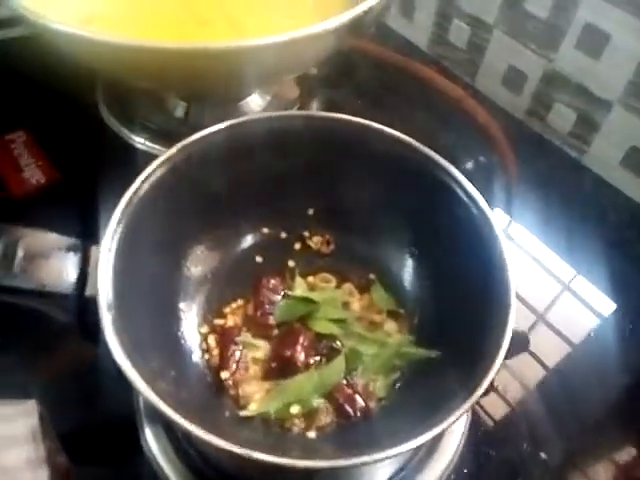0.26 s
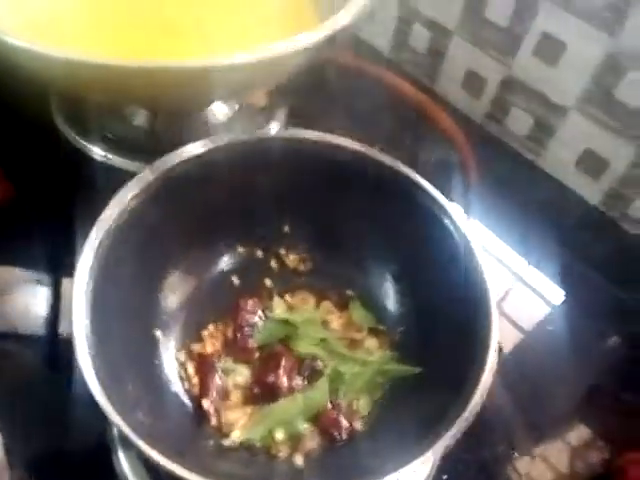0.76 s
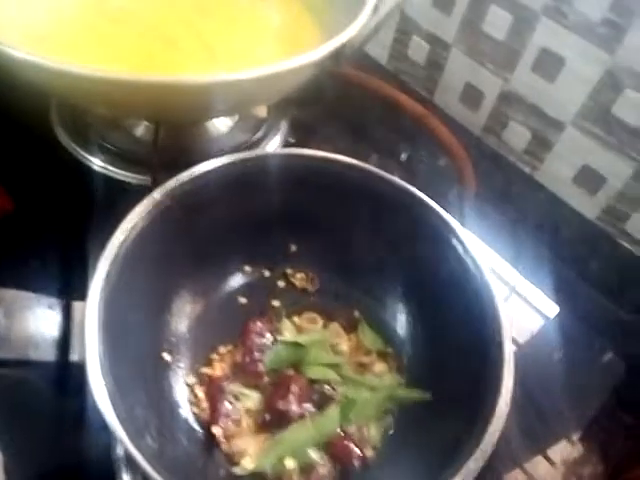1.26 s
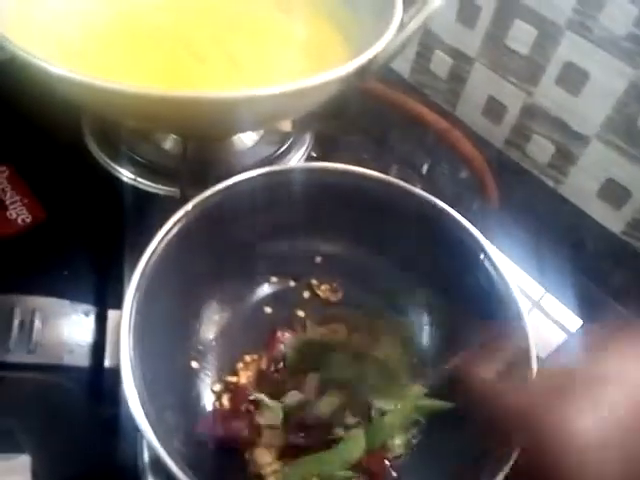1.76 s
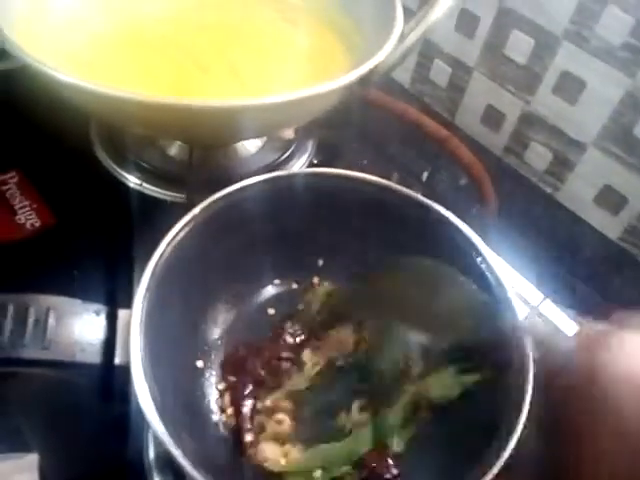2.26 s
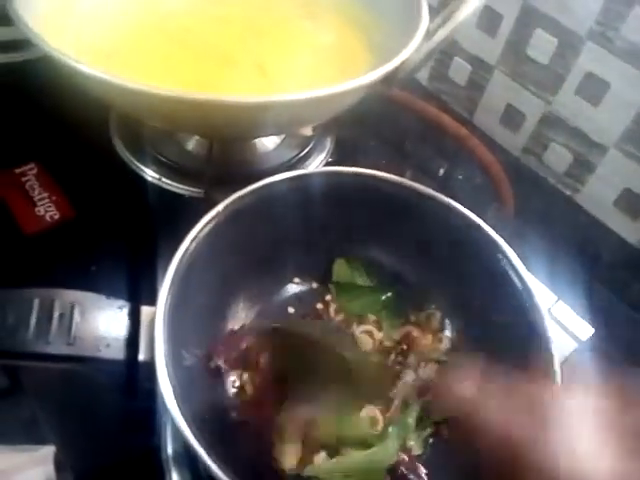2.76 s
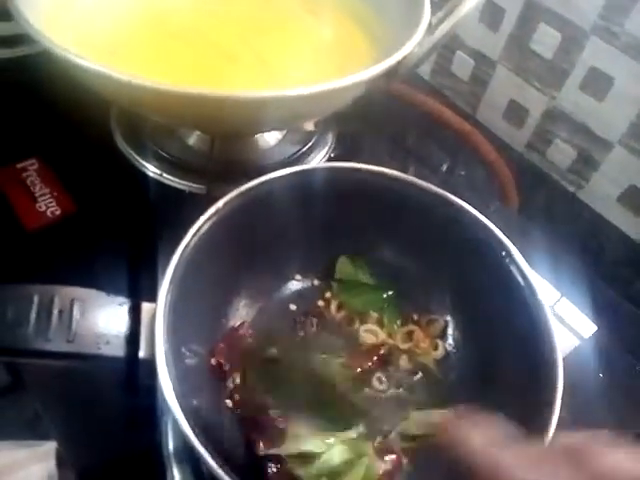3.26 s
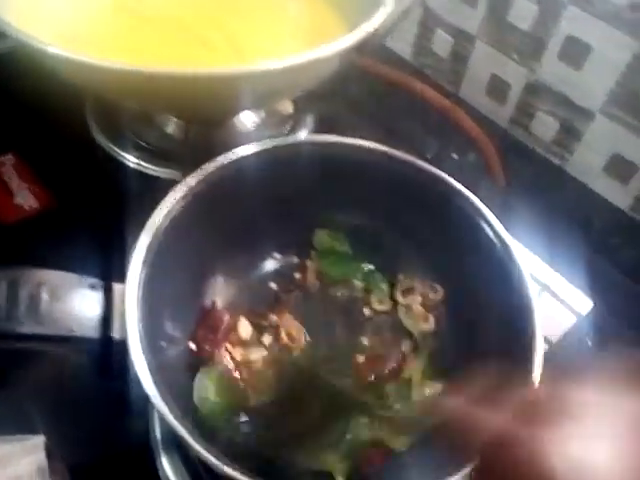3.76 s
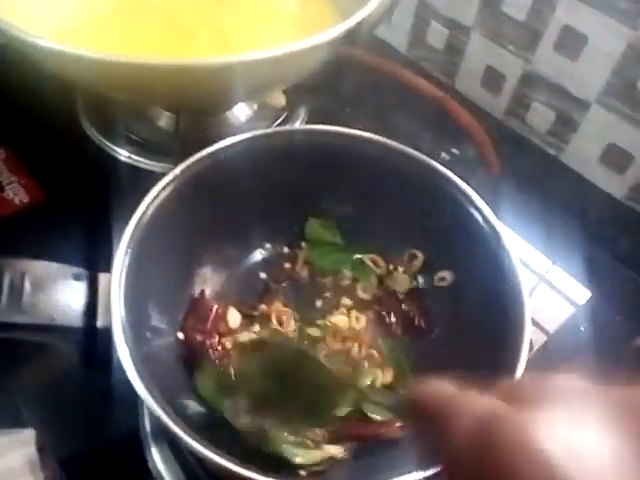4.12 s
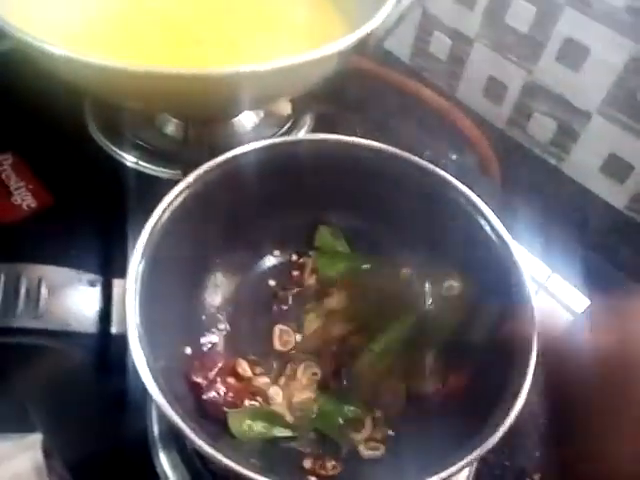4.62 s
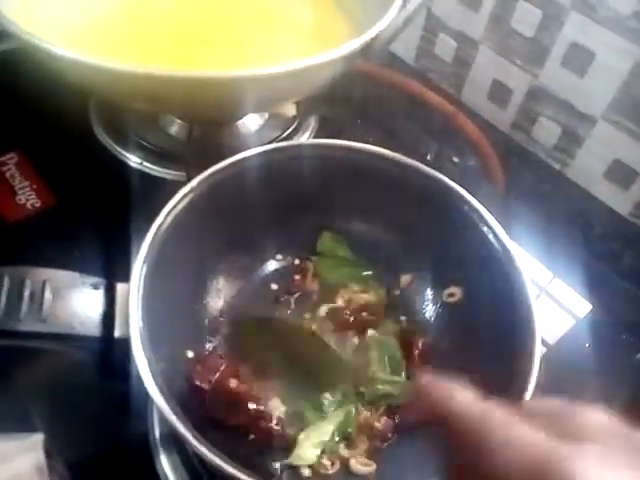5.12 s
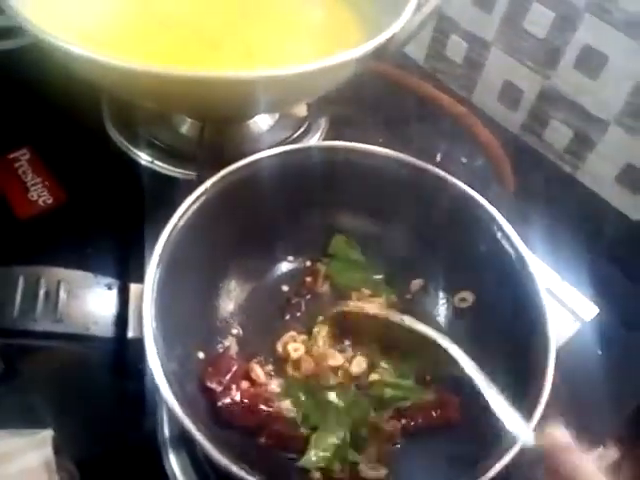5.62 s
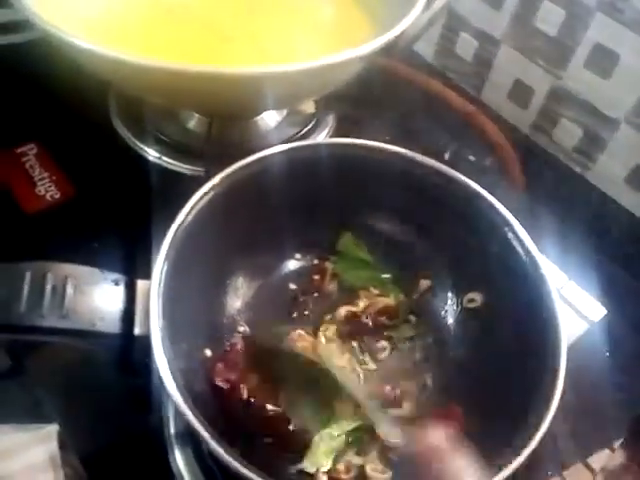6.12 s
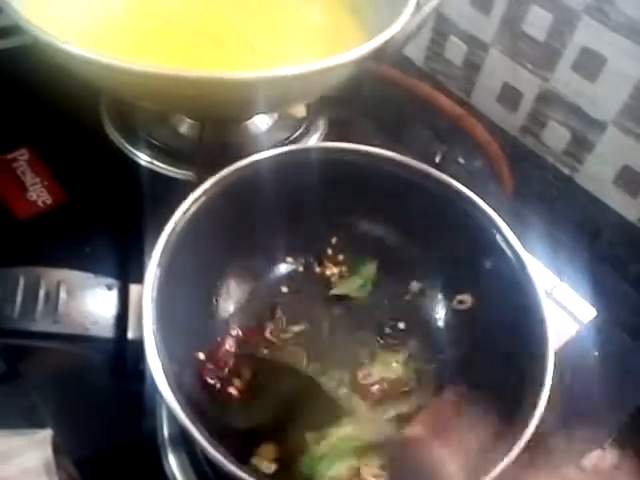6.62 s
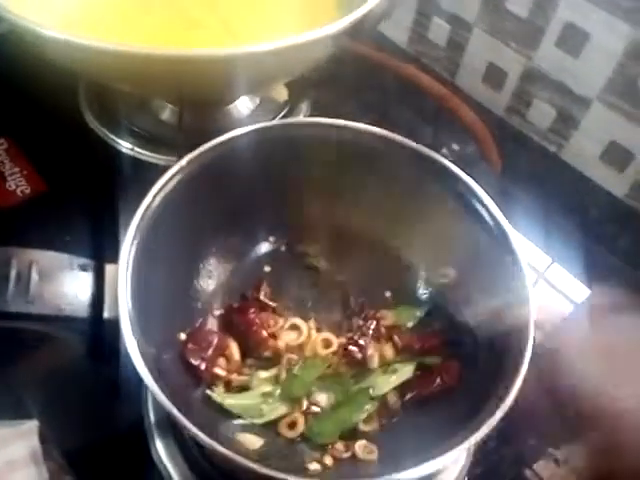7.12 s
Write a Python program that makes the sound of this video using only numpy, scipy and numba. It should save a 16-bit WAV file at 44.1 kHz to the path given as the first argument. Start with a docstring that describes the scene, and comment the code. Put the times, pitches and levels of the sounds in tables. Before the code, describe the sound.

A close phone pickup of spices frying in a small pan, in a tiled kitchen with short faint echoes. A steady, soft gas and room hiss lies underneath throughout. At the start a blurred metallic clink fades away; at 0.2 s a pod bursts with a hard crack, the loudest moment, and a broad roar that shakes the pan and cuts off by about 0.5 s. Thin sizzle and small ticks follow, with light scrapes at 0.7 and 1.2 s. From 1.5 s a spoon stirs, tapping the pan. Bright pops and crackle thicken from 2.3 s, with crunchy strokes and knocks near 2.6, 3.3 and 4.1 s, and the densest snapping around 4.8 to 5.3 s. More taps and pops come until 6 s. Then the sizzle sinks, with a faint scrape at 6.4 s, one sharp snap at 6.9 s and tiny ticks to the end near 7.4 s.

```python
"""A small pan of seeds, onion rings, chillies and brittle leaves in a little oil, close under a phone.
A blurred clink fades from earlier clatter; almost at once a pod bursts, a noise roar that shakes the pan.
Then damped-sine steam pockets sizzle, and spoon strokes swell them into flurries among sharp pops and knocks.
The knocks drive the pan's resonances; pops and knocks echo off kitchen tiles through a delay network.
Late on the sizzle sinks. Shaped noise hisses underneath throughout: the gas flame and the house."""
import sys
import numpy as np
from scipy import signal
from scipy.fft import rfft, irfft
from scipy.io import wavfile
from scipy.ndimage import uniform_filter1d
from numba import njit

SR = 44100
rng = np.random.default_rng(int(sys.argv[2]) if len(sys.argv) > 2 else 0)


def wrap_up_sound(samples):
    """Save the sound to the file named by the first command line argument, as 16-bit audio."""
    columns = np.atleast_2d(samples).T
    # keep every value between -1 and 1, then stretch to whole-number steps
    tamed = np.clip(columns, -1, 1)
    steps = np.round(tamed * 32767).astype(np.int16)
    wavfile.write(sys.argv[1], SR, steps)


N = 325458  # samples

# All dB in the tables stand ahead of the phone; in spectra and pan modes only the balance counts.
# burner and house hiss, spectrum: pitch_hz [Hz], density_db [dB per Hz]
FLAME_SPECTRUM = [(18, -57), (30, -8), (253, 1), (333, -17.5), (609, -0.5), (1690, 2.5), (3230, -5),
                  (5890, 3), (7090, -28.5), (7600, 7.5), (9880, -44), (16700, -120)]
# clink from earlier clatter: pitch_hz [Hz], width_hz [Hz], rms level_db before the fade [dB], t60_s [s]
OPENING_RING = [(1030, 36, -52.5, 0.56), (1460, 170, -48, 0.39), (2470, 40, -59, 0.47),
                (4860, 100, -55, 0.44)]
# resonances of the pan: pitch_hz [Hz], width_hz [Hz], level_db [dB]
PAN_MODES = [(329.5, 51, -3), (631, 194, -7.5), (974, 80, -15), (1670, 160, -10), (2020, 220, -11.5),
             (2840, 254, -11.5), (3446, 205, -10.5), (4133, 264, -7)]
# roar of the bursting pod, spectrum: pitch_hz [Hz], density_db [dB per Hz]
BURST_SPECTRUM = [(88, -57), (150, -38), (341, -12), (738, -12), (1980, -11), (2410, -5), (4070, -9.5),
                  (5560, -1.5), (7600, -14), (9880, -69), (16700, -120)]
# spoon and flying seeds knock the pan, drive before the mixing gains in knocks():
# start_s [s], level_db [dB], whole_pan_db against level_db [dB], pitch_hz [Hz]
KNOCKS = [(0.182, -8.5, -8.5, 3050), (1.1927, -37, -15, 923), (1.5508, -23.5, -28, 3740),
          (1.5775, -20.5, -18.5, 2970), (1.8481, -28, -20, 1670), (2.4826, -28, -21, 1820),
          (2.596, -21, -25, 3460), (2.6323, -25, -19, 1740), (2.7447, -23.5, -29, 3020),
          (2.8908, -37, -31, 2030), (3.109, -27, -28, 2820), (3.2792, -13.5, -38, 1570),
          (3.2994, -23.5, -17, 2900), (3.44, -17.5, -11.5, 1750), (3.686, -20, -21, 1620),
          (3.714, -16, -18.5, 3630), (3.8148, -25.5, -19, 1940), (3.977, -22.5, -28, 3130),
          (4.0751, -21, -17, 1690), (4.1061, -18.5, -19, 2830), (4.2788, -21.5, -27, 2620),
          (4.4205, -25, -12.5, 1990), (4.6663, -22.5, -20.5, 2890), (4.7877, -16.5, -39, 1660),
          (4.8821, -23.5, -19, 2030), (4.9789, -20, -30, 1810), (5.024, -8, -26, 2600),
          (5.1247, -20, -28, 3600), (5.2264, -46, -18, 3580), (5.4612, -26.5, -32, 3600),
          (5.7947, -33.5, 8.5, 950), (5.8274, -14, -14, 3400), (5.9519, -19, -23.5, 3100),
          (5.9775, -20, -19.5, 3260), (6.8803, -26, -32, 3570)]
# loudest single pops, drive before the trim and filter in pops(): start_s [s], level_db [dB], pitch_hz [Hz]
POPS = [(0.0538, -31, 5030), (0.182, 4, 4780), (0.1851, 0.5, 5350), (0.2082, -1.5, 5240), (0.389, -9, 5720),
        (0.5302, -26, 6190), (0.5858, -29.5, 3377), (0.656, -40, 6030), (0.7682, -36, 6720),
        (0.9905, -25, 3700), (1.2203, -29.5, 6760), (1.293, -27, 6150), (1.3487, -30.5, 6040),
        (1.5519, -15.5, 6300), (1.5953, -17, 5930), (1.6585, -34, 5850), (1.853, -20.5, 5280),
        (1.8687, -12, 5520), (2.0572, -19, 5940), (2.1395, -18.5, 6100), (2.174, -21, 6100),
        (2.3087, -13.5, 6040), (2.4239, -23, 5970), (2.4818, -13, 6430), (2.5526, -10.5, 5930),
        (2.593, -6.5, 7080), (2.6075, -8.5, 5860), (2.6309, -9.5, 5730), (2.6414, -5.5, 6150),
        (2.7192, -9, 6150), (2.8355, -15, 5440), (2.8908, -9, 6370), (2.9956, -16, 5630),
        (3.1083, -10, 6050), (3.1884, -25, 6090), (3.2798, -8, 4930), (3.3164, -6.5, 6970),
        (3.4411, -12.5, 5680), (3.6471, -11, 5870), (3.707, -5, 6350), (3.8212, -26, 6210),
        (3.928, -2, 7090), (3.9709, -12, 5000), (4.0422, -11.5, 5790), (4.0751, -3, 5950),
        (4.1077, -4, 5780), (4.2048, -5, 6870), (4.2378, -10, 6030), (4.3061, -10, 5750),
        (4.4204, 0.5, 6080), (4.6703, -16.5, 6840), (4.7531, -20.5, 6040), (4.7998, -2.5, 5720),
        (4.8828, -7.5, 5980), (4.9033, -9.5, 6200), (4.9541, -12.5, 5660), (4.9791, 2.5, 5590),
        (5.024, -1.5, 5980), (5.036, 1, 6600), (5.1075, -11, 5750), (5.1248, -5.5, 6430),
        (5.1497, -10, 6740), (5.1956, -5, 6850), (5.2268, -10, 6320), (5.3381, -23.5, 6600),
        (5.3802, -18, 7100), (5.4605, -7.5, 4850), (5.4809, -8.5, 7050), (5.5139, -4.5, 6400),
        (5.6454, -19, 6970), (5.8152, -14.5, 4030), (5.8606, -9.5, 6300), (5.8989, -11, 6960),
        (5.9514, -12, 6450), (5.9763, -3.5, 6670), (6.221, -32, 5560), (6.6496, -27.5, 5900),
        (6.7471, -27.5, 6100), (6.8788, -10, 6290), (7.228, -28.5, 5820), (7.3002, -30.5, 6300),
        (7.3447, -27, 5100)]
# sizzle of steam pockets, spectrum: pitch_hz [Hz], density_db [dB per Hz]
FIZZ_SPECTRUM = [(1760, -37), (3000, -25.5), (4600, -13), (5900, -2.5), (7250, -5.5), (7610, -11.5),
                 (8080, -40), (8520, -40), (11100, -62), (18700, -120)]
# how hard the food sizzles, before and after the burst, more while the spoon stirs:
# start_s [s], treble level_db [dB]
SIZZLE = [
    [(0.0, -42), (0.17, -51.5)],
    [(0.46, -49.5), (0.86, -51.5), (1.58, -54.5), (1.75, -53.5), (1.96, -47.5), (2.29, -37.5),
     (2.73, -32.5), (3.12, -42), (3.77, -39), (4.16, -36), (4.51, -39), (4.79, -41.5), (5.01, -27),
     (5.07, -27.5), (5.24, -48), (5.57, -49), (5.93, -44.5), (6.51, -52), (6.78, -46.5), (7.38, -57)],
]
# spoon crushes leaves and seeds against the pan, then lifts: start_s [s], length_s [s], treble level_db [dB]
STROKES = [(0.726, 0.075, -48.5), (1.157, 0.16, -49.5), (1.542, 0.16, -39), (2.585, 0.078, -28),
           (2.72, 0.17, -35), (3.27, 0.029, -27), (3.425, 0.11, -38.5), (3.643, 0.1, -29),
           (3.788, 0.042, -32.5), (3.912, 0.11, -34.5), (4.057, 0.073, -22.5), (4.203, 0.099, -26),
           (4.406, 0.02, -30), (4.774, 0.044, -26.5), (4.868, 0.272, -28), (5.188, 0.045, -30.5),
           (5.45, 0.031, -28.5), (5.51, 0.025, -33), (5.799, 0.11, -26), (5.953, 0.017, -26.5),
           (6.36, 0.23, -51), (6.874, 0.017, -34)]
# pan wall, then whole pan, following the sizzle: level_db at a sizzle of -45 dB [dB], slope [dB per dB]
WALL_FOLLOWS = (-54, 0.7)
WHOLE_FOLLOWS = (-67.5, 0.1)
# crackle set off by a pop, then by a knock: level_db against the event's drive [dB], t60_s [s]
POP_FLURRY = (-18, 0.16)
KNOCK_FLURRY = (-13.5, 0.16)

FLAME_DB = -58.5  # rms
BURST_S, BURST_END_S, BURST_T60_S = 0.1815, 0.44, 0.82
BURST_DB, BURST_WHOLE_DB = -17.5, -20.5  # rms of the roar before its fade; whole pan against the roar
STROKE_ATTACK_S, STROKE_RELEASE_DB_PER_S = 0.015, 501.5
STROKE_WALL_DB, STROKE_WHOLE_DB = -10, -35  # against the stroke's treble
POP_RING_DB, POP_RING_CYCLES, POP_CRACK_DB = -19.5, 150, -20  # dB against the pop's drive
KITCHEN_T60_S, KITCHEN_DAMP, KITCHEN_DB = 0.2, 0.3, -17  # t60 before damping; damping 0 to 1; echo gain
MIC_HZ, SAMPLE_HZ, TOP_HZ, MIRROR_DB = 7820, 16000, 8678, -30


def undb(db):
    """Decibels to amplitude gain."""
    return 10 ** (np.asarray(db) / 20)


def level(x, db):
    """Set the rms level in dB."""
    return x * undb(db) / np.sqrt(np.mean(x ** 2))


def highpass(x, order, hz):
    """Butterworth cut of the bass."""
    return signal.sosfilt(signal.butter(order, hz, "high", fs=SR, output="sos"), x)


def colour(x, points):
    """Shape the spectrum by (Hz, dB) points with minimum phase, so that clicks stay sharp in front."""
    hz, db = np.transpose(points)
    size = 2048
    f = np.maximum(np.arange(size // 2 + 1), 1) * SR / size
    curve_db = np.maximum(np.interp(np.log(f), np.log(hz), db), -70)
    cepstrum = irfft(np.log(undb(curve_db)))
    # folding the cepstrum forward makes the filter causal
    cepstrum[1:size // 2] *= 2
    cepstrum[size // 2 + 1:] = 0
    return signal.fftconvolve(x, irfft(np.exp(rfft(cepstrum))))[:N]


def ring(x, hz, width_hz):
    """One resonance, gain 1 at its centre."""
    return signal.lfilter(*signal.iirpeak(hz, hz / width_hz, SR), x)


@njit
def grains(n, at, hz, cycles, size):
    """Damped sine blips, each falling to 1 / e in its number of cycles."""
    y = np.zeros(n)
    for k in range(len(at)):
        turn = np.exp((2j * np.pi - 1 / cycles[k]) * hz[k] / SR)
        z = size[k] + 0j
        for i in range(at[k], min(n, at[k] + int(6 * cycles[k] * SR / hz[k]))):
            y[i] += z.imag
            z *= turn
    return y


def walk(rate_hz):
    """Random levels, each held for 1 / rate_hz seconds with slewed steps; spread near 1."""
    hold = int(SR / rate_hz)
    steps = np.repeat(rng.standard_normal(N // hold + 1), hold)
    return uniform_filter1d(steps, hold // 2)[:N]


@njit
def walls(x, lags, gain, damp):
    """Tiled walls as eight delay lines that feed each other, duller on every round."""
    line, soft, out = np.zeros((8, 4096)), np.zeros(8), np.zeros(len(x))
    for i in range(len(x)):
        total = 0.
        for k in range(8):
            soft[k] += (1 - damp) * (gain[k] * line[k, (i - lags[k]) & 4095] - soft[k])
            total += soft[k]
        out[i] = soft[0] - soft[3] + soft[5] - soft[6]
        for k in range(8):
            line[k, i & 4095] = x[i] + soft[k] - total / 4
    return out


def flame():
    """Steady noise hiss of the burner and the house, wavering a little."""
    hiss = colour(rng.standard_normal(N), FLAME_SPECTRUM)
    return level(undb(1.5 * walk(8)) * hiss, FLAME_DB)


def opening_ring():
    """Blurred clink: noise through narrow resonances, each band dying away evenly in dB."""
    t = np.arange(N) / SR
    out = np.zeros(N)
    for hz, width_hz, db, t60_s in OPENING_RING:
        band = ring(ring(rng.standard_normal(N), hz, width_hz), hz, width_hz)
        out += undb(-60 * t / t60_s) * level(band, db)
    return out


def pan(force, low=False, wander_db=0):
    """The pan wall answers with modes above 900 Hz, or the whole pan on its stand with those below.
    With wander_db, each mode's level drifts as food and spoon move about."""
    modes = np.zeros(N)
    for k, (hz, width_hz, db) in enumerate(PAN_MODES):
        if (hz < 900) == low:
            gain = undb(db + wander_db * walk(18))
            modes += (-1) ** k * gain * ring(force, hz, width_hz)
    return highpass(modes, 3, 170)


def burst():
    """A pod bursts: a broad noise roar that shakes the whole pan, dies evenly, then falls off short."""
    t = np.arange(N) / SR
    fade_db = -60 * (t - BURST_S) / BURST_T60_S - 250 * np.maximum(t - BURST_END_S, 0)
    noise = rng.standard_normal(N)
    roar = level(colour(noise, BURST_SPECTRUM), BURST_DB)
    shaken_pan = level(pan(noise, low=True), BURST_DB + BURST_WHOLE_DB)
    onset = np.clip((t - BURST_S) / 0.0013, 0, 1)
    return (roar + shaken_pan) * undb(np.minimum(fade_db, 0)) * onset


def knocks():
    """Each knock pushes the wall near its own pitch, waking the closest modes most, and jolts the whole pan."""
    start_s, level_db, whole_db, hz = np.transpose(KNOCKS)
    at = (start_s * SR).astype(np.int64)
    push = grains(N, at, hz, 2.73 + 0 * start_s, undb(level_db))
    jolt = np.zeros(N)
    jolt[at] = undb(level_db + whole_db)
    contact = undb(6.0) * np.gradient(push)
    wall = undb(12.0) * pan(push)
    whole = undb(22.5) * pan(jolt, low=True)
    return highpass(contact + wall + whole, 3, 260)


def pops():
    """Each pop is a sharp blip with a few splinters close behind; so small a source sends out no bass. The
    pan's bowl rings on at the pop's pitch, and the bursting skin cracks an octave lower."""
    start_s, level_db, hz = np.transpose(POPS)
    draw = rng.random((len(start_s), 3, 4))
    splinter = np.arange(4) > 0  # the first of four blips is the pop itself
    lag_s = 0.0026 * draw[:, 0] * splinter
    at = ((start_s[:, None] + lag_s) * SR).astype(np.int64)
    tone_hz = hz[:, None] * (1 + 0.5 * (draw[:, 1] - .5) * splinter)
    size = undb(level_db[:, None] - 1000 * lag_s - 8 * splinter)  # 1 dB less per ms
    cycles = 3 + 4 * draw[:, 2]
    blips = grains(N, at.ravel(), tone_hz.ravel(), cycles.ravel(), size.ravel())
    first = at[:, 0].copy()
    bowl_ring = grains(N, first, hz, POP_RING_CYCLES + 0 * start_s, undb(level_db + POP_RING_DB))
    crack = grains(N, first, hz / 2, 1 + 0 * start_s, undb(level_db + POP_CRACK_DB))
    return undb(-3.0) * highpass(blips + bowl_ring + crack, 2, 1500)


def flurry(start_s, level_db, shape):
    """Power envelope of crackles set off by events: a sudden rise at each, then an even fade in dB."""
    under_db, t60_s = shape
    kicks = np.zeros(N)
    np.add.at(kicks, (start_s * SR).astype(np.int64), undb(2 * (level_db + under_db)))
    return signal.lfilter([1], [1, -undb(-2 * 60 / t60_s / SR)], kicks)


def strokes():
    """Power envelope of the spoon's pressure: quick rise, hold, steep release."""
    t = np.arange(N) / SR
    press = np.zeros(N)
    for start_s, length_s, db in STROKES:
        release_db = STROKE_RELEASE_DB_PER_S * np.clip(t - start_s - length_s, 0, 1)
        rise = np.clip((t - start_s) / STROKE_ATTACK_S, 0, 1)
        press += undb(2 * (db - release_db)) * rise
    return press


def crackle():
    """Thousands of steam pockets a second sizzle and drive the pan, some bigger than the rest.
    Spoon strokes swell all of it; pops set off flurries in the treble, knocks in the pan."""
    treble_db = np.interp(np.arange(N) / SR, *np.transpose(np.vstack(SIZZLE)))
    wall_db = WALL_FOLLOWS[0] + WALL_FOLLOWS[1] * (treble_db + 45)
    whole_db = WHOLE_FOLLOWS[0] + WHOLE_FOLLOWS[1] * (treble_db + 45)
    pop_s, pop_db, _ = np.transpose(POPS)
    knock_s, knock_db, knock_whole_db, _ = np.transpose(KNOCKS)

    # powers add, then the root gives amplitude
    press = strokes()
    treble_power = undb(2 * treble_db) + press + flurry(pop_s, pop_db, POP_FLURRY)
    wall_power = undb(2 * wall_db) + undb(2 * STROKE_WALL_DB) * press
    wall_power += flurry(knock_s, knock_db, KNOCK_FLURRY)
    whole_power = undb(2 * whole_db) + undb(2 * STROKE_WHOLE_DB) * press
    whole_power += flurry(knock_s, knock_db + knock_whole_db, KNOCK_FLURRY)

    # single steam pockets over the whole scene, 2.5 to 8 kHz
    draw = rng.random((18000, 4)).T
    at = (draw[0] * N).astype(np.int64)
    patches = walk(70)
    size = undb(np.minimum(-3.6 * np.log(draw[1]), 18) + 2.5 * patches[at])
    hz = 2500 * (8000 / 2500) ** draw[2]
    blips = grains(N, at, hz, 2 + 8 * draw[3] ** 2, size)
    force = np.zeros(N)
    np.add.at(force, at, size * np.sign(draw[3] - .5))

    # the finest bubbles blur into a hiss under the blips
    hiss = undb(2.5 * patches) * rng.standard_normal(N)
    fizz = colour(level(blips, 0) + level(hiss, -4), FIZZ_SPECTRUM)
    wall = pan(level(force, 0) + level(hiss, -3), wander_db=4)
    whole = pan(rng.standard_normal(N), low=True, wander_db=3)
    treble_part = np.sqrt(treble_power) * level(fizz, 0)
    wall_part = np.sqrt(wall_power) * level(wall, 0)
    whole_part = np.sqrt(whole_power) * level(whole, 0)
    return treble_part + wall_part + whole_part


def scene():
    """Pops and knocks echo off the tiles; crackle, burst, flame and clink stay dry."""
    near = pops() + knocks()
    lags = rng.integers(150, 1500, 8)  # samples
    round_gain = undb(-60 * lags / SR / KITCHEN_T60_S)
    tiles = walls(near + 1e-18, lags, round_gain, KITCHEN_DAMP)  # tiny offset avoids slow denormals
    mix = near + undb(KITCHEN_DB) * tiles
    mix = mix + crackle() + burst() + flame() + opening_ring()
    return mix[None]


def record(dry):
    """The phone rounds peaks and has the band of 16 kHz sampling, with a faint mirror of its top."""
    x = highpass(np.tanh(1.3 * dry) / 1.3, 1, 60)
    x = signal.sosfilt(signal.cheby2(12, 30, MIC_HZ, fs=SR, output="sos"), x)
    # multiplying by the sampling tone folds the band over; only the part above 8250 Hz is kept
    mirror = 2 * x * np.cos(2 * np.pi * SAMPLE_HZ * np.arange(N) / SR)
    mirror = signal.sosfilt(signal.ellip(10, 1, 80, 8250, "high", fs=SR, output="sos"), mirror)
    top = signal.ellip(10, .5, 75, TOP_HZ, fs=SR, output="sos")
    return signal.sosfilt(top, x + undb(MIRROR_DB) * mirror)


dry = scene()
out = record(dry)
wrap_up_sound(out)
```